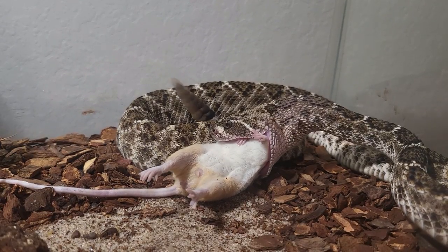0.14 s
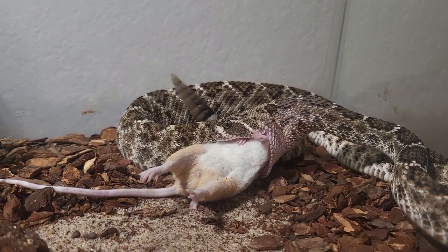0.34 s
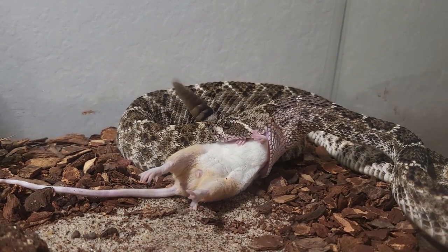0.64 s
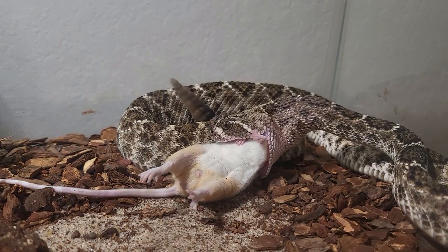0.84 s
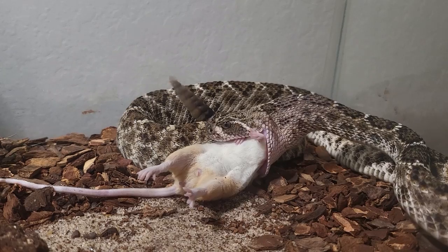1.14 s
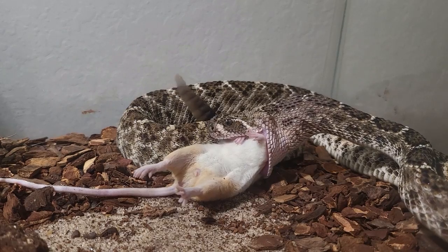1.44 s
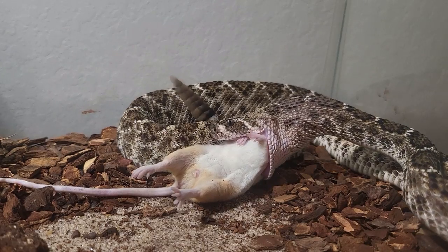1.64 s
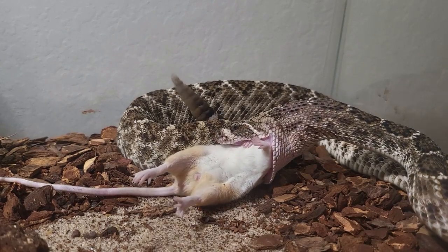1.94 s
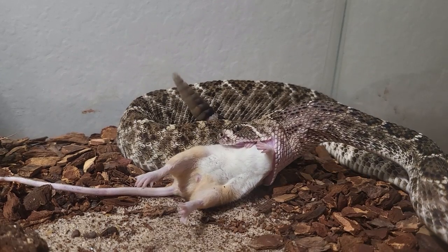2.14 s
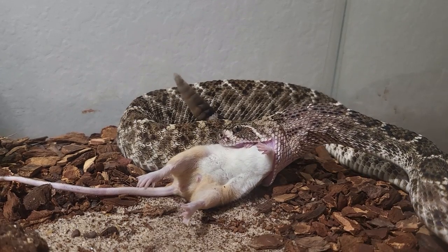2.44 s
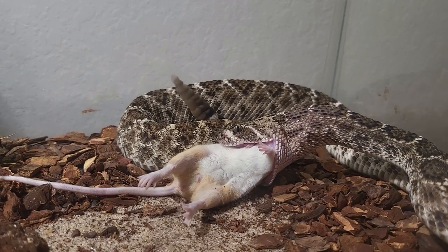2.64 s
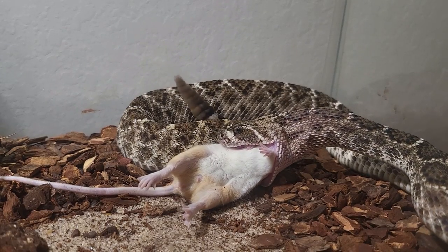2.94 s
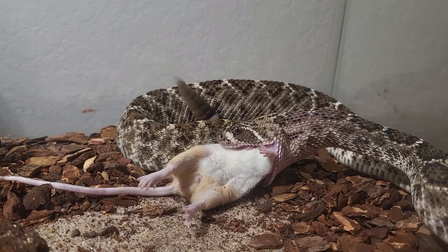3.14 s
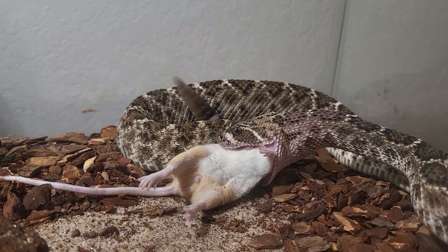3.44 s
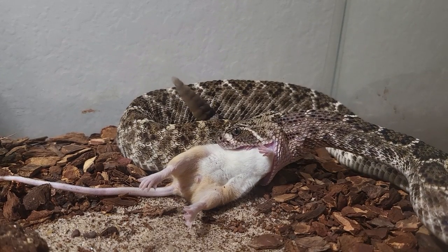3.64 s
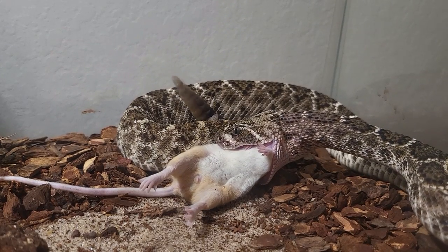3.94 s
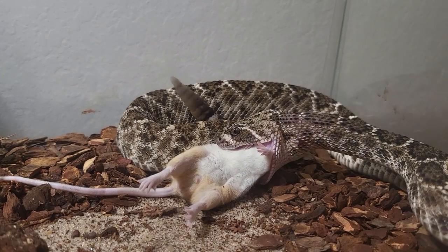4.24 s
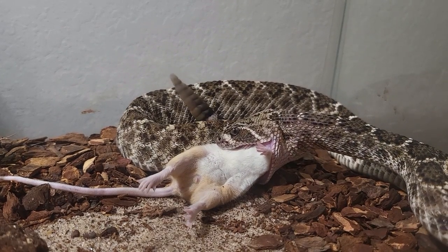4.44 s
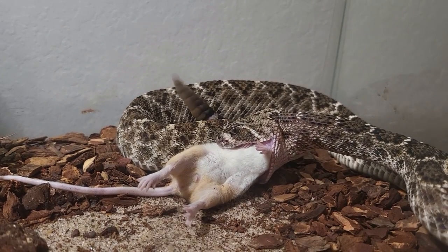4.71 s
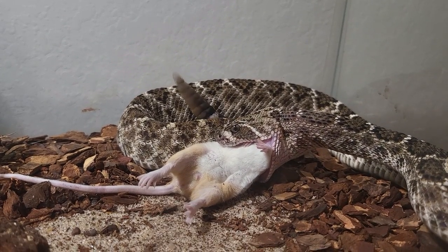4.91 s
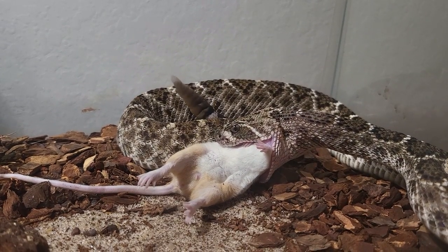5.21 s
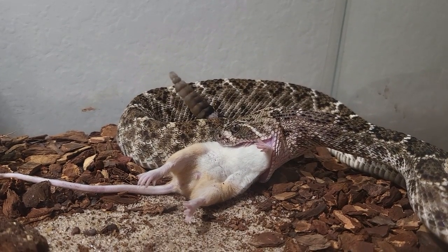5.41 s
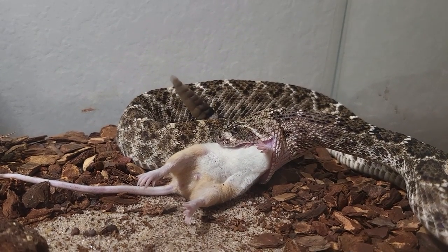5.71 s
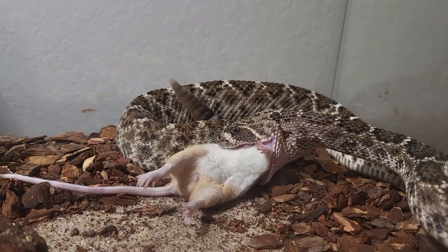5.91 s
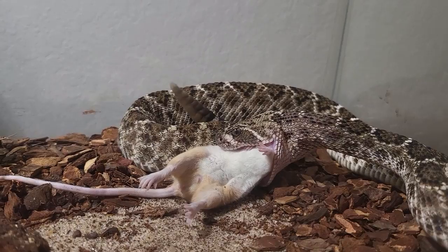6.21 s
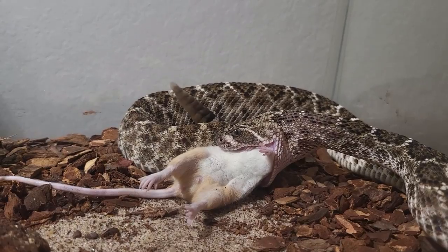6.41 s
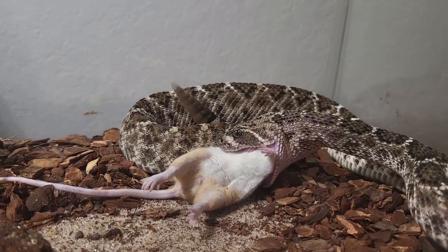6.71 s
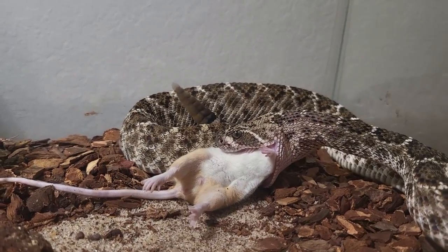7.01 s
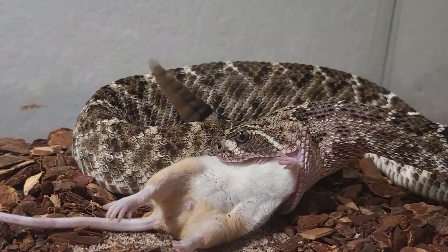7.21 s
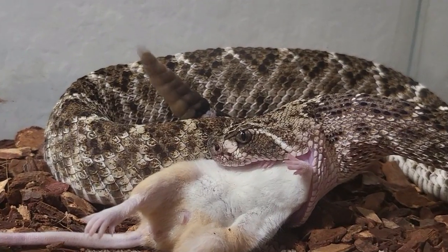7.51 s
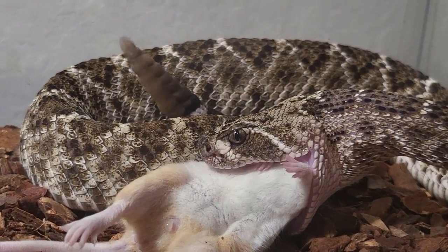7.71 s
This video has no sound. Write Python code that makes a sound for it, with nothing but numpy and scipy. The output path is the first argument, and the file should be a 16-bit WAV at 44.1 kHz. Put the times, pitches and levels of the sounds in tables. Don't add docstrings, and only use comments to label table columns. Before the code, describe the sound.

From 0 s a rattlesnake's tail buzzes continuously, close and slightly right of centre in a hard-walled tank: dry, papery, bright clacking, about 21 swings a second, with a rough throb and short coloured reflections. It quickens to about 25 swings around 2.5 s, growing slightly stronger, then gradually slows to 20 by 5.7 s. A faint low ventilation hum lies beneath. Around 5.53 s there is a very faint tick at left; from 5.63 s a low scraping drag and small soft knocks begin there, and a second bright rattle bursts out for about 0.2 s. The strongest knock, short and dull, lands at 5.97 s, with a weaker one at 6.2 s. Meanwhile the main rattle jumps louder and more even, swelling further until the end at 7.86 s. A thin second buzz stays at left, bright at first, dulling from 6.9 s.

```python
import sys
import numpy as np
from scipy import signal
from scipy.fft import rfft, irfft, next_fast_len
from scipy.io import wavfile
from scipy.ndimage import uniform_filter1d

SR = 44100
rng = np.random.default_rng(int(sys.argv[2]) if len(sys.argv) > 2 else 0)


def amplitude_ratio(level_db):
    exponent = np.asarray(level_db, float) / 20
    return 10 ** exponent


def inscribe(sig):
    pcm = np.round(np.clip(np.atleast_2d(sig).T, -1, 1) * 32767)
    wavfile.write(sys.argv[1], SR, pcm.astype(np.int16))


N = 346626
SIZE = next_fast_len(N + SR // 2)
HZ = np.arange(SIZE // 2 + 1) * SR / SIZE + 1e-3
JOIN_HZ = 7570


# (time [s], rate [swings/s])
TAIL_SPEED = [
    (0, 22.0),
    (.3, 20.94),
    (1.3, 21.57),
    (2.1, 23.66),
    (2.5, 24.99),
    (3.1, 24.18),
    (4.2, 23.87),
    (4.7, 21.87),
    (5.7, 20.12),
    (7.86, 20.12),
]
# (time [s], level [dB])
ALARM_EFFORT = [
    (0, -0.5),
    (5.64, 0.5),
    (5.73, 5),
    (6.0, 5.5),
    (6.9, 7),
    (7.12, 6),
    (7.86, 8.5),
]
# (frequency [Hz], level [dB per Hz])
SEGMENT_COLOUR = [(650, -34), (1000, -30.5), (1500, -26), (1750, -25), (2040, -24), (2190, -19.5),
                  (3050, -11), (3340, -6.5), (4260, -6.5), (4760, -3), (5240, -5), (5600, 0), (6000, 1.5),
                  (6490, 0.5), (7100, -2.5), (7600, 1.5), (8300, -4), (10200, -4), (11700, 0), (12600, -5),
                  (15600, -7)]
# (frequency [Hz], left minus right [dB])
FIRST_BALANCE = [(1000, -2), (2400, 0), (4400, -4), (7400, -3), (7900, -4.5), (8600, -3.5), (9300, -3.5),
                 (10000, -3.5), (10700, -12.5), (11400, -6.5), (13400, -5.2), (14100, -5), (15500, -5.5)]
# (frequency [Hz], width [Hz], lift [dB])
RIGHT_MODES = [(1180, 92, 6.2), (1510, 150, 7.7), (1860, 70, 6), (1965, 30, 7), (2140, 50, 6),
               (2270, 40, 3), (2400, 64, 3.3), (2570, 85, 2.6), (2720, 50, 5), (2810, 50, 5), (2890, 30, 4),
               (3090, 130, 2.3), (3330, 55, 7.1), (3430, 53, 5.4), (3740, 68, 4.3), (3970, 58, 6.7),
               (4070, 41, 7.3), (4210, 61, 9.8), (4340, 60, 6.0), (4480, 67, 4.2), (4590, 56, 8.0),
               (4790, 51, 7.4), (4880, 43, 6.5), (5050, 45, 5.2), (5370, 43, 5.4), (5570, 91, 6.8),
               (5790, 54, 4.6), (5890, 30, 4.9), (6000, 46, 6.3), (6070, 54, 5.8), (6260, 80, 2.4),
               (6440, 123, 2.0), (6600, 150, 3.2), (6860, 58, 3.0), (6990, 39, 1.9), (7180, 45, 3.9),
               (7470, 46, 6.0), (7700, 32, 3.6), (8060, 41, 6.5), (8480, 90, 2.8), (8680, 76, 6.7),
               (8790, 41, 5.5), (9000, 50, 3.0), (9100, 113, 1.9), (9580, 54, 4.7), (9780, 91, 3.7),
               (9970, 48, 1.4), (10190, 81, 3.5), (10610, 40, 3.1), (11020, 87, 3.8), (11320, 53, 2.2),
               (11470, 97, 2.7), (11820, 48, 6.6), (12050, 51, 3.4), (12310, 45, 4.0), (12550, 43, 1.4),
               (12670, 73, 2.1), (12810, 60, 2.6)]
# (frequency [Hz], width [Hz], lift [dB])
LEFT_MODES = [(1210, 85, 1.3), (1530, 85, 6.7), (1880, 70, 3), (1965, 35, 6), (2140, 50, 8),
              (2410, 53, 4.7), (2560, 75, 5.0), (2810, 34, 3.8), (2900, 49, 4.3), (2980, 74, 3.5),
              (3080, 46, 2.9), (3170, 61, 2.3), (3350, 53, 4.9), (3620, 73, 3.2), (3790, 44, 3.8),
              (3880, 41, 1.5), (4030, 127, 6.3), (4190, 63, 5.8), (4450, 127, 6.4), (4770, 94, 8.4),
              (5030, 67, 2.3), (5240, 48, 4.5), (5390, 38, 5.2), (5470, 40, 5.4), (5620, 60, 7.4),
              (5950, 122, 6.0), (6270, 33, 5.1), (6440, 57, 7.4), (6550, 31, 2.6), (6660, 94, 4.5),
              (6820, 54, 6.6), (6990, 52, 5.8), (7130, 83, 4.6), (7250, 48, 4.4), (7540, 82, 4.0)]


def first_rattle():
    idle_per_s, idle_db, db_per_swing = 20.86, -39, 0.78
    idle_depth, depth_loss = 0.49, 3.4
    first_swing = .52
    lag_s = .00086
    per_s, = in_time(TAIL_SPEED)
    effort_db = db_per_swing * (per_s - idle_per_s) + in_time(ALARM_EFFORT)[0]
    depth = idle_depth * amplitude_ratio(-depth_loss * np.maximum(effort_db, 0))
    swing = np.cos(2 * np.pi * (first_swing + np.cumsum(per_s) / SR))
    uneven_db = (-0.18 + 0.64 * depth) * flutter(35) + (1.1 + 2.4 * depth) * flutter(110)
    throb = np.sqrt(np.clip(1 + 2.02 * depth * swing, .05, 3)) * amplitude_ratio(uneven_db)

    right_db = ridges_db(RIGHT_MODES)
    left_db = np.where(HZ > JOIN_HZ, right_db, ridges_db(LEFT_MODES))
    sides = amplitude_ratio(on_grid(FIRST_BALANCE) * [[1], [0]])
    colour = amplitude_ratio(on_grid(SEGMENT_COLOUR) + np.array([left_db, right_db])) * sides

    tip_from_hz, tip_throb_share = 9600, .4
    buzz = swept(9000, 3.2, throb, 0.14, 4.8, lag_s, count=2)
    tip = swept(9000, 3.2, throb ** tip_throb_share, 0.27, 4.8, lag_s, count=1)
    tip_share = .7 / (1 + (tip_from_hz / HZ) ** 8)
    heard = through(buzz, colour * np.sqrt(1 - tip_share))
    heard = heard + through(tip, colour * np.sqrt(2 * tip_share))
    return amplitude_ratio(idle_db + effort_db) * heard / np.std(heard[1])


# (frequency [Hz], level [dB per Hz])
SECOND_COLOUR = [(1060, -50), (1950, -32), (2250, -15), (3150, -3), (5280, 1), (6040, 4.5), (7640, 5),
                 (8600, -4), (10600, 2), (11700, 5.5), (12600, -1), (15600, -3)]
# (frequency [Hz], width [Hz], lift [dB])
CORNER_MODES = [(2290, 104, 4.2), (3080, 50, 2.6), (3350, 54, 6.0), (3660, 91, 2.7), (3790, 73, 3.2),
                (4190, 58, 1.1), (4430, 53, 2.7), (4510, 37, 3.3), (4760, 92, 5.9), (4930, 54, 2.2),
                (5230, 62, 1.3), (5670, 35, 6.7), (5910, 126, 5.0), (6090, 52, 3.8), (6300, 47, 2.5),
                (6450, 88, 5.1), (6660, 62, 6.2), (6800, 47, 6.3), (6920, 40, 2.4), (7040, 34, 3.6),
                (7240, 49, 4.0), (7380, 75, 1.9), (7560, 65, 5.9), (7730, 62, 6.8), (7990, 41, 2.7),
                (8070, 45, 3.2), (8480, 49, 4.0), (8660, 99, 6.7), (9020, 131, 1.9), (9450, 35, 2.6),
                (10190, 73, 2.4), (10310, 55, 6.7), (10480, 91, 4.9), (10620, 42, 3.4), (11530, 63, 4.0),
                (11760, 100, 2.7), (12190, 50, 1.5), (12560, 52, 2.8)]
# (time [s], level under its peak [dB])
BURST_ENVELOPE = [
    (5.6, -60),
    (5.64, -22),
    (5.66, -7),
    (5.693, 0),
    (5.75, -.6),
    (5.8, -2.5),
    (5.83, -7),
    (5.88, -12),
    (6.0, -30),
]
# (time [s], level at the left microphone [dB], share of treble [0-1])
AFTER_BUZZ = [
    (5.7, -71, 0.8),
    (5.88, -38, 1),
    (6.3, -36, 0.98),
    (6.55, -37.5, 1),
    (6.9, -38.5, 0.4),
    (7.1, -40.5, 0),
    (7.5, -36.5, .15),
    (7.86, -38, 0.2),
]


def second_rattle():
    burst_peak_db, right_db = -28, -12.5
    burst_dull_hz, after_thin_hz, away_dull_hz = 12000, 5300, 10200
    buzz = swept(8000, 3.7, amplitude_ratio(.8 * flutter(41)), 0.12, 4.9, -0.00064, count=2)
    heard = rms_one(through(buzz, amplitude_ratio(on_grid(SECOND_COLOUR) + ridges_db(CORNER_MODES))))
    burst_db = burst_peak_db + np.interp(np.arange(N) / SR, *np.transpose(BURST_ENVELOPE), right=-60)
    after_db, treble = in_time(AFTER_BUZZ)
    burst, after, treble = amplitude_ratio(burst_db), amplitude_ratio(after_db), np.clip(treble, 0, 1)
    full = through(heard, 1 / np.sqrt(1 + (HZ / burst_dull_hz) ** 4))
    thin = through(heard, 1 / np.sqrt(1 + (after_thin_hz / HZ) ** 8))
    away = through(thin, 1 / np.sqrt(1 + (HZ / away_dull_hz) ** 12))
    steady = treble * thin + (1 - treble) * away
    both = (burst ** 2 * full + after ** 2 * steady) / np.hypot(burst, after)
    return amplitude_ratio(np.array([[0], [right_db]])) * both


# (frequency [Hz], level [dB per Hz])
FRICTION_COLOUR = [(35, -19), (60, 1), (96, -3), (133, -11.5), (367, -2), (509, -10.5), (879, -11.5),
                   (2500, -7.5), (3250, -38), (5500, -120)]


def slide():
    start_s, slide_db, sag_db_per_s = 5.628, -56.5, 14.5
    grains = clicks(2500, 2.1) * amplitude_ratio(1.6 * drift(28))
    opposed = np.where(HZ > 330, [[1], [-1]], 1)
    heard = through(grains, amplitude_ratio(on_grid(FRICTION_COLOUR)) * tank(0.03, 0.0) * opposed)
    sag_db = sag_db_per_s * np.clip(np.arange(N) / SR - start_s, 0, 1)
    push_db = slide_db - sag_db + swell_db(start_s, 0.047, 0.42, 0.033, range_db=22.0)
    settle_db = -72 + swell_db(6.18, .03, 0.25, 0.62, range_db=18.0)
    level = np.hypot(amplitude_ratio(push_db + 4.5), amplitude_ratio(settle_db))
    return level * amplitude_ratio(np.array([[3], [-5]])) * rms_one(heard)


# (time [s], peak [dB], first pitch [Hz], last pitch [Hz], decay to -60 dB [s])
WALL_KNOCKS = [(5.53, -53, 1340, 1330, 0.083), (5.649, -42.5, 400, 344, 0.087),
               (5.681, -47, 410, 377, 0.055), (5.735, -48, 300, 200, .05), (5.784, -47, 270, 250, .05),
               (5.803, -49, 830, 700, 0.057), (5.816, -45, 700, 536, 0.045), (5.83, -48, 110, 90, .06),
               (5.844, -44.5, 377, 375, 0.07), (5.966, -30.5, 517, 141, 0.042),
               (5.98, -45.5, 100, 85, 0.055), (6.001, -48, 420, 400, .04), (6.061, -55, 446, 397, 0.034),
               (6.26, -48, 362, 332, 0.054), (6.206, -39, 385, 340, 0.046)]


def knocks():
    right_db = -25
    out, t = np.zeros((2, N)), np.arange(SR // 8) / SR

    def ring(phase, t60, attack_s):
        return np.sin(phase) * amplitude_ratio(-60 * t / t60) * (1 - np.exp(-t / attack_s))

    thud = 0.21 * ring(2 * np.pi * 90 * t, 0.089, 0.0064)
    crack = 0.24 * ring(2 * np.pi * 800 * t, 0.014, 0.001)
    for s, db, first_hz, last_hz, t60 in WALL_KNOCKS:
        hz = last_hz + (first_hz - last_hz) * np.exp(-t / 0.0052)
        wall = ring(2 * np.pi * np.cumsum(hz) / SR, t60, 0.0048)
        at = round(s * SR)
        out[:, at:at + len(t)] += amplitude_ratio(db + 4.0 + np.array([[0], [right_db]])) * (wall + thud + crack)
    return out


# (frequency [Hz], level [dB per Hz])
HUM_COLOUR = [(12, -62), (20, -30), (27, -25), (38, -27), (53, -6.5), (96, -10), (125, -11), (225, -13),
              (300, -4.5), (325, -12), (375, -28), (406, -10), (456, -16.5), (733, -14.5), (795, -35),
              (1000, -26), (1300, -48), (2200, -120)]
# (frequency [Hz], width [Hz], level [dB])
ROOM_MODES = [(58.3, 4.6, -7), (73, 6, 1), (90, 7, 2), (108, 8, 0), (141, 7, -3), (173, 10, -3),
              (195, 10, 0), (219, 7, 1), (237, 13, 2.5), (268, 7, -2), (281, 6, -1), (338, 9, -6),
              (357, 8, -4), (372, 10, 2.5), (407, 8, -12), (450, 8, -11), (475, 6, -12)]
# (frequency [Hz], likeness [-1 to 1])
CHANNEL_LIKENESS = [(25, .45), (55, .87), (120, .68), (190, .92), (250, .82), (285, .6), (315, .1),
                    (345, .65), (380, .6), (410, -.25), (445, -.5), (520, -.2), (650, -.55), (750, -.2)]
# (frequency [Hz], left minus right [dB])
HUM_BALANCE = [(25, 2), (55, 0), (110, -1), (200, 2.5), (290, -3), (350, -1.5), (420, 0.5), (600, 2),
               (730, -2)]


def hum():
    hum_db, mains_hz, mains_db = -64, 59.8, -78
    alike = np.clip(on_grid(CHANNEL_LIKENESS), -1, 1)
    colour = resonances(on_grid(HUM_COLOUR), ROOM_MODES, 0)
    mid, side = through(rng.standard_normal((2, N)), colour * np.sqrt([1 + alike, 1 - alike]))
    mains = np.sin(2 * np.pi * mains_hz * np.arange(N) / SR)
    mains = mains * amplitude_ratio(mains_db + 2 + 3.1 * drift(5.1))
    balance = amplitude_ratio(on_grid(HUM_BALANCE) * [[.5], [-.5]])
    rumble = rms_one(through(np.array([mid + side, mid - side]), balance))
    return amplitude_ratio(hum_db + 1.0 * drift(15.0)) * rumble + mains * amplitude_ratio(np.array([[-1.5], [1.5]]))


def swept(per_s, spread_db, throb, t60, wet_db, lag_s, count):
    places = range(count)
    return sum(through(throb * clicks(per_s, spread_db), tank(t60, wet_db, lag_s)) for _ in places)


def clicks(per_s, spread_db):
    sizes = amplitude_ratio(spread_db * np.minimum(rng.exponential(1, N), 5)) * rng.choice([-1, 1], N)
    return rms_one(sizes * (rng.random(N) < per_s / SR))


def tank(t60, wet_db, lag_s=0):
    t = np.arange(SR // 4) / SR
    echoes = rng.standard_normal((2, len(t))) * amplitude_ratio(-60 * t / t60) * (t > .002)
    echoes *= amplitude_ratio(wet_db) / np.sqrt(np.sum(echoes ** 2, axis=1, keepdims=True))
    direct = np.exp(-2j * np.pi * HZ * lag_s * np.array([[1], [0]]))
    paths = direct + rfft(echoes, SIZE)
    paths /= np.sqrt(uniform_filter1d(np.abs(paths) ** 2, size=300, axis=-1))
    return np.where(HZ > JOIN_HZ, paths[1], paths)


def ridges_db(peaks):
    hz = np.arange(0, SR / 2, 10)
    lift_db = sum(db / (1 + (2 * (hz - at_hz) / width) ** 2) for at_hz, width, db in peaks)
    return np.interp(HZ, hz, lift_db - uniform_filter1d(lift_db, size=65))


def resonances(colour_db, peaks, lift_db):
    rings = sum(amplitude_ratio(db + lift_db) ** 2 / (1 + (2 * (HZ - hz) / width) ** 2) for hz, width, db in peaks)
    return np.sqrt(amplitude_ratio(colour_db) ** 2 + rings)


def through(x, response):
    run_in = x[..., SIZE - N - 1::-1]
    return irfft(rfft(np.concatenate([x, run_in], axis=-1)) * response, SIZE)[..., :N]


def drift(rate):
    r = np.exp(-80 * np.pi * rate / SR)
    slow = signal.lfilter([1], [1, -2 * r, r * r], rng.standard_normal(N // 40 + 2002))[2000:]
    return np.interp(np.arange(N) / 40, np.arange(len(slow)), rms_one(slow))


def flutter(rate):
    chance = drift(rate)
    return rms_one(chance - uniform_filter1d(chance, size=SR // 12))


def swell_db(start_s, attack_s, hold_s, release_s, range_db):
    edges = start_s + np.cumsum([-.02, .02, attack_s, hold_s, release_s, .1])
    return np.interp(np.arange(N) / SR, edges, [-60, -range_db, 0, 0, -range_db, -60])


def rms_one(x):
    return x / np.sqrt(np.mean(x ** 2) + 1e-20)


def in_time(rows):
    s, *columns = np.transpose(rows)
    return [np.interp(np.arange(N) / SR, s, c) for c in columns]


def on_grid(points):
    hz, value = np.transpose(points)
    return np.interp(np.log(HZ), np.log(hz), value)


def scene():
    return first_rattle() + second_rattle() + slide() + knocks() + hum()


# (frequency [Hz], level under which a band is dropped [dB])
MASKING_LIMIT = [(380, -14), (520, -4), (800, -2), (1300, -1), (1600, -2), (1850, -0.5), (2050, -3),
                 (2600, -2), (3100, -3), (3500, -18)]
# (frequency [Hz], exponent on loudness [1])
MASKING_GROWTH = [(600, .7), (900, .85), (1700, 1.05), (3000, 1.15)]


def masked_valley(hz, both):
    trio = np.array([both[0], both[1], (both[0] + both[1]) / 2])
    band = np.minimum(np.arange(len(hz)) // 4 * 4 + 2, len(hz) - 1)
    power = uniform_filter1d(np.abs(trio) ** 2, size=4, axis=-2)
    power = uniform_filter1d(power, size=2, axis=-1)[:, band]
    power = np.array([power[0] + power[1], power[2]])
    growth = np.interp(hz, *np.transpose(MASKING_GROWTH))[:, None]
    loudness = uniform_filter1d(power[0].sum(axis=0), size=5) ** growth
    usual = np.median(power / loudness, axis=-1, keepdims=True) * loudness
    limit = amplitude_ratio(np.interp(hz, *np.transpose(MASKING_LIMIT)))[:, None] ** 2
    sides_kept, sum_kept = power > limit * usual
    return (both - trio[2] * ~sum_kept) * sides_kept


def joined_treble(x):
    frame, frame_start, band_bins, cutoff_hz = 2048, 297, 32, 15750
    pan_step_db, centred_db, pan_jitter_db = 1.5, 2.2, .8
    flip_share, flip_lean_db = .085, -3
    lead = frame // 2 - frame_start
    hz, _, both = signal.stft(np.pad(x, ((0, 0), (lead, 0))), SR, nperseg=frame)

    def banded(power):
        bands = power[..., :-1, :].reshape(*power.shape[:-2], -1, band_bins, power.shape[-1])
        return bands.mean(axis=-2) + 1e-18

    mid = both.mean(axis=0)
    left, right = banded(np.abs(both) ** 2)
    jitter, dice = rng.standard_normal(left.shape), rng.random(left.shape)
    pan_db = 10 * np.log10(left / right)
    evenness = amplitude_ratio(-uniform_filter1d(pan_db, size=9, axis=-1) ** 2)
    flipped = dice < flip_share * (.06 + evenness)
    pan_db = pan_step_db * np.round((pan_db + pan_jitter_db * jitter) / pan_step_db)
    pan = amplitude_ratio(pan_db * (np.abs(pan_db) > centred_db) + flip_lean_db * flipped)
    right_share = np.sqrt((left + right) / banded(np.abs(mid) ** 2) / (1 + pan ** 2))
    share = np.array([pan * right_share, np.where(flipped, -1, 1) * right_share])
    share = share[:, np.minimum(np.arange(len(hz)) // band_bins, len(left) - 1)]
    kept = np.where(hz[:, None] > JOIN_HZ, mid * share, masked_valley(hz, both))
    kept = kept * (hz[:, None] < cutoff_hz)
    return signal.istft(kept, SR, nperseg=frame)[1][:, lead:lead + N]


def low_pass(x):
    return signal.sosfilt(signal.butter(12, 16810, fs=SR, output="sos"), x)


def record(dry):
    mix = joined_treble(dry)
    return low_pass(mix)


dry = scene()
out = record(dry)
inscribe(out)
```